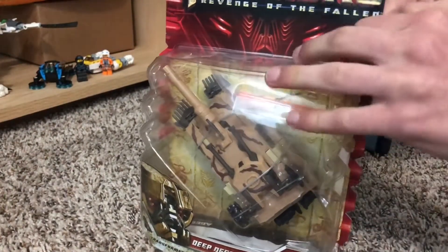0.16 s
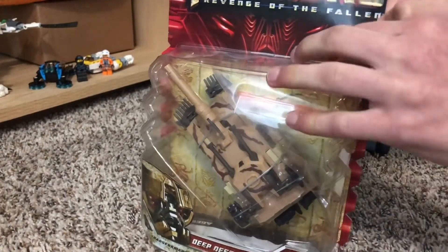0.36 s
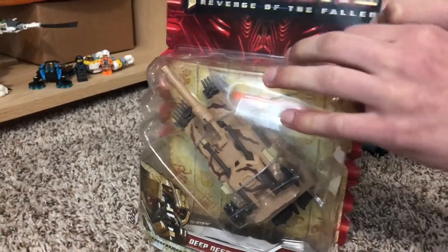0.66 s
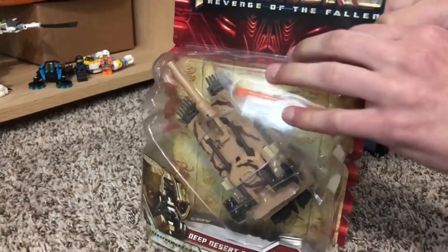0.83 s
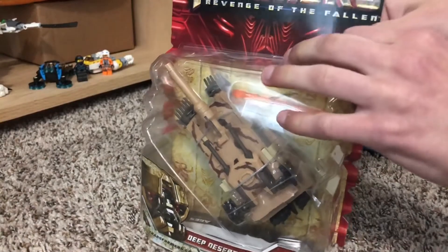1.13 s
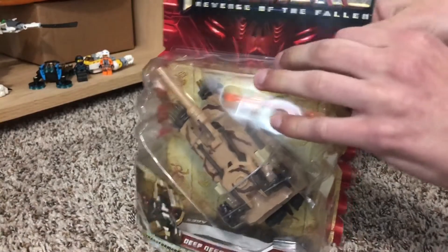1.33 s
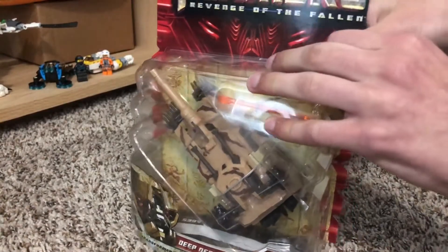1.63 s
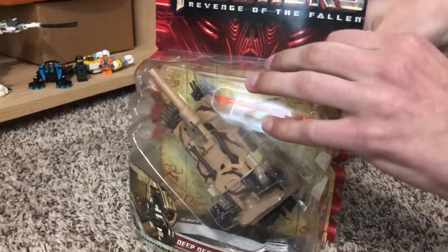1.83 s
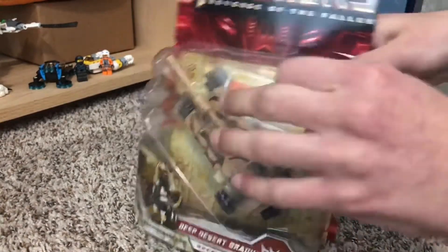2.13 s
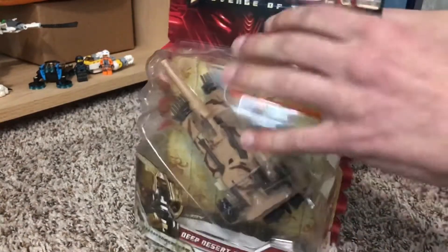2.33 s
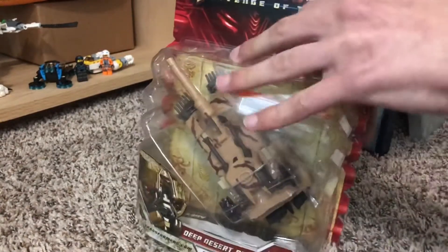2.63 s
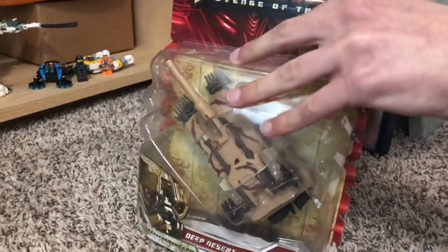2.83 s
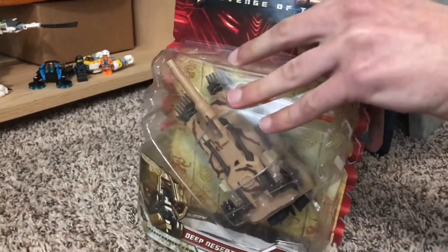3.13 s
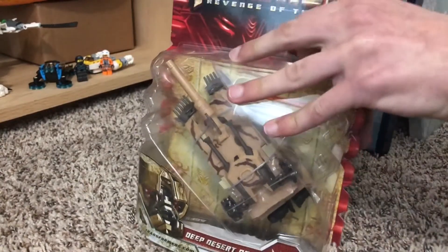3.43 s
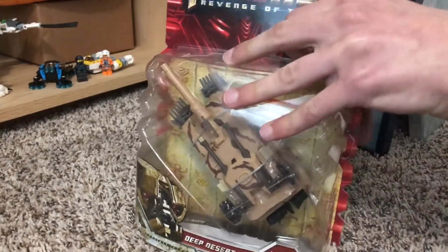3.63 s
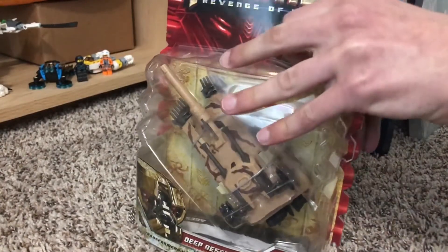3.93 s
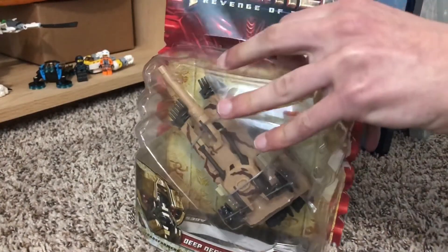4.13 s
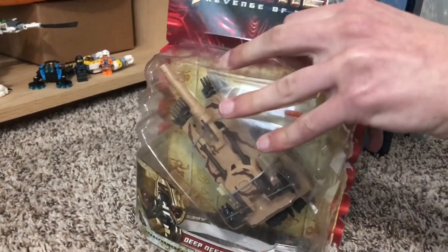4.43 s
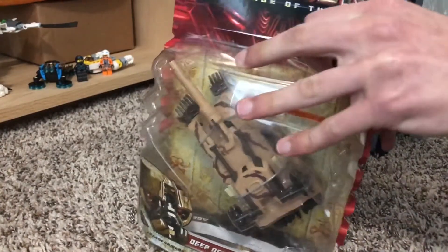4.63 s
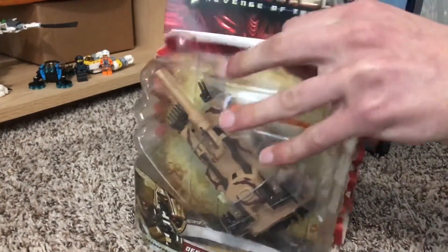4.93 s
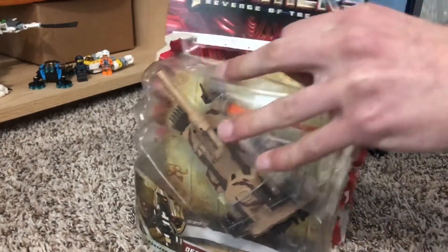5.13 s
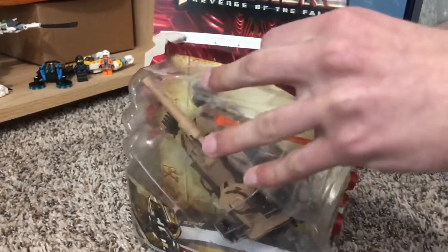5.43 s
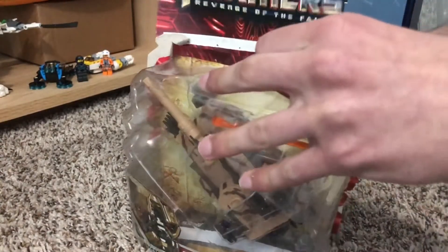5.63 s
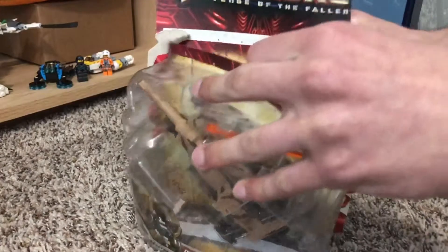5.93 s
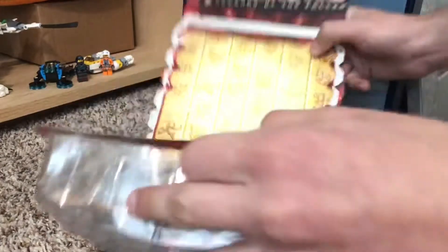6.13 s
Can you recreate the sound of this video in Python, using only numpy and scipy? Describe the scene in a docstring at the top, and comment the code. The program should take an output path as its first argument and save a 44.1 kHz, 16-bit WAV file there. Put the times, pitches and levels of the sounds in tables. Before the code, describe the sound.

A close, dry recording of stiff plastic packaging peeled from cardboard in a small carpeted room, over faint air, soft handling rumble and a low wavering hum that fades. The first half second is nearly quiet, with only slight seam crackle. From 0.65 to 1.5 s small snaps, ticks and short rips appear, with dull finger scuffs on card. Around 1.8 to 2.1 s hollow pops thicken over a steady rip and a soft bump. Louder single pops strike at 2.7 and 3.0 s, then sharp bright cracks at 3.5 s. A swelling tear with clustered snaps peaks at 4.0 to 4.1 s, followed by a lull. At 4.8 to 4.95 s a harder ripping burst comes with low bumps. Pops continue at 5.25, 5.35 and 5.5 s, then a dense, loud volley of cracks and tearing at 5.9 to 6.0 s, one last snap near 6.1 s, and quiet.

```python
"""Sharp snaps and hollow pops of a stiff plastic blister shell, peeled off its cardboard close by in a carpeted room.
Each snap is a run of cracks that rings the shell's modes; one panel resonates at its own pitch over a hollow boom.
Between them the glued seam rips in spurts of tiny random fibre breaks, with plastic crinkles and drumming card.
Single glue spots tick (noise bursts) and a few times the pack bumps the carpet (short, damped low tones).
Behind lie a low wavering hum, a soft rumble and air (shaped noise); diffuse reflections surround the pack."""
import sys
import numpy as np
from scipy import signal
from scipy.fft import rfft, irfft
from scipy.io import wavfile

SR = 44100
rng = np.random.default_rng(int(sys.argv[2]) if len(sys.argv) > 2 else 0)


def transcribe(signal):
    """Save signal, clipped to [-1, 1], as a 16-bit WAV file at the path in sys.argv[1]."""
    frames = np.atleast_2d(signal).T
    limited = np.clip(frames, -1, 1)
    pcm = np.round(limited * 32767).astype(np.int16)
    wavfile.write(sys.argv[1], SR, pcm)


N = 276830
CUTOFF_HZ = 16100  # top of the shell modes and of the finished sound
RING = 4096  # length of a short sound and of the filter spectra, in samples
FADE = np.linspace(5, -1, RING).clip(0, 1)  # full level at first, then a smooth close


def from_db(db):
    """Decibels to gain."""
    return 10 ** (np.asarray(db) / 20)


def rms_one(x):
    """Scale to unit power."""
    return x / np.sqrt(np.mean(x ** 2) + 1e-20)


def at_hz(points, hz):
    """Read a curve over pitch on a log-frequency axis."""
    point_hz, value = np.transpose(points)
    return np.interp(np.log(hz + 1), np.log(point_hz), value)


def causal(gain):
    """The minimum-phase response with these gains: nothing sounds early."""
    cepstrum = irfft(np.log(gain + 1e-6))
    cepstrum[1:RING // 2] *= 2
    cepstrum[RING // 2 + 1:] = 0
    return np.exp(rfft(cepstrum))


def coloured(x, spectrum):
    """Filter by a spectrum; white input keeps its power."""
    hz = np.fft.rfftfreq(RING, 1 / SR)
    gain = rms_one(from_db(at_hz(spectrum, hz)))
    return signal.fftconvolve(x, irfft(causal(gain)))[:N]


def drift(rate):
    """Random wandering with spread 1, taking a new direction `rate` times per second."""
    knots = rng.standard_normal(int(N / SR * rate) + 2)
    return rms_one(np.interp(np.arange(N) / SR * rate, np.arange(len(knots)), knots))


def add(out, s, sound):
    """Mix a sound in at a time."""
    at = max(int(s * SR), 0)
    out[at:at + len(sound)] += sound[:max(N - at, 0)]


# fader moves of the room hum: time_s, level_db
HUM_LEVEL = [(0, -49), (.6, -57.5), (2.4, -51.5), (2.7, -66), (4.3, -62), (6.28, -68)]
# tone of the rumble of hands on the pack: pitch_hz, density_db (per Hz, relative)
RUMBLE_TONE = [(40, -23.5), (85, 2), (125, -3.5), (190, -10.5), (240, -1.5), (320, -28.5), (700, -44.5)]
# tone of the still air: pitch_hz, density_db (per Hz, relative)
AIR_TONE = [(25, -11), (50, 5), (130, 5), (240, 3), (310, -1), (520, 2), (760, 2.5), (1050, 1.5),
            (1550, 1.5), (2400, -4), (4000, -10), (8000, -22.5), (16000, -49)]
RUMBLE_DB, AIR_DB = -52.5, -52


def background(hum_hz, wavers_per_s):
    """A low sine wavering in level and phase, the noise rumble of hands on the pack, and still air as noise."""
    t = np.arange(N) / SR
    hum_s, hum_db = np.transpose(HUM_LEVEL)
    phase = 2 * np.pi * hum_hz * t
    hum = rms_one((5.4 + drift(wavers_per_s)) * np.sin(phase) + drift(wavers_per_s) * np.cos(phase))
    rumble = coloured(rng.standard_normal(N), RUMBLE_TONE)
    air = coloured(rng.standard_normal(N), AIR_TONE)
    return from_db(np.interp(t, hum_s, hum_db)) * hum + from_db(RUMBLE_DB) * rumble + from_db(AIR_DB) * air


# how long the room rings, to 60 dB down: pitch_hz, t60_s
ROOM_T60 = [(150, 0.22), (500, 0.29), (1400, 0.38), (3700, 0.24), (10000, 0.2), (16000, 0.1)]


def room(x, wet_db, first_s):
    """Diffuse reflections start after a short gap and die band by band."""
    t, tail = np.arange(SR // 2) / SR, 0
    edges = np.geomspace(100, 17000, 11)
    for low, high in zip(edges, edges[1:]):
        t60 = at_hz(ROOM_T60, np.sqrt(low * high))
        band_pass = signal.butter(2, [low, high], "band", fs=SR, output="sos")
        band = signal.sosfilt(band_pass, rng.standard_normal(len(t)))
        tail = tail + band * np.exp(-np.log(1000) * t / t60)
    # silent until first_s, fully open at twice that
    opening = np.clip(t / first_s - 1, 0, 1)
    return from_db(wet_db) * signal.fftconvolve(x, tail * opening)[:N]


# a few times the pack bumps the carpet: start_s, drive_db (before attack and decay), pitch_hz
THUMPS = [(1.979, -21, 163), (4.846, -25, 206), (4.888, -22, 144), (4.902, -25, 140)]


def thumps(attack_s, decay_s):
    """The bumped pack swings for a few cycles, damped by hands and carpet."""
    out, t = np.zeros(N), np.arange(RING) / SR
    envelope = (1 - np.exp(-t / attack_s)) * np.exp(-t / decay_s) * FADE
    for s, drive_db, hz in THUMPS:
        add(out, s, from_db(drive_db) * np.sin(2 * np.pi * hz * t) * envelope)
    return out


# single spots of glue let go: start_s, strength_db (relative)
TICKS = [(0.9173, -23.5), (1.0503, -31), (1.3375, -30.5), (1.457, -26.5), (1.563, -27.5), (1.697, -26.5),
         (1.9405, -20), (2.18, -25.5), (2.204, -30), (2.4593, -30.5), (2.6374, -24.5), (2.7891, -20.5),
         (2.9253, -26), (3.0352, -14.5), (3.153, -39), (3.756, -21), (3.8765, -24), (4.066, -22),
         (4.198, -39), (4.362, -34.5), (4.3798, -31), (4.7363, -25.5), (5.06, -32.5), (5.1412, -27),
         (5.2143, -26), (5.2754, -24), (5.668, -33), (5.809, -32.5), (6.2311, -27.5)]
# bright tone of tearing paper, for the ticks and the seam: pitch_hz, density_db (per Hz, relative)
RIP_TONE = [(300, -6), (900, 7), (2000, 1.5), (3800, 2.5), (5500, 2.5), (8500, 2.5), (12000, -1.5),
            (16000, -4)]


def glue_ticks(decay_s, level_db):
    """Each spot of glue parts with a tiny bright burst that scatters briefly in the card."""
    out, t = np.zeros(N), np.arange(RING) / SR
    scatter = from_db(-14) * np.exp(-t / (4 * decay_s))
    burst = np.exp(-t / decay_s) + scatter
    for s, strength_db in TICKS:
        add(out, s, from_db(strength_db + level_db) * rng.standard_normal(RING) * burst)
    return coloured(out, RIP_TONE)


def breaks(per_s, spread_db):
    """Fibres break at random, with widely spread strengths; unit power."""
    born = rng.random(N) < per_s / SR
    strength = from_db(spread_db * np.minimum(rng.exponential(1, N), 4))
    return rms_one(born * strength * rng.choice([-1, 1], N))


def slips(per_s, decay_s, spread_db, creep):
    """The tear front jumps: each jump starts at once and dies fast, over a steady creep; unit power."""
    sizes = from_db(spread_db * np.clip(rng.standard_normal(N), -2, 2))
    jumps = (rng.random(N) < per_s / SR) * sizes
    return rms_one(creep + signal.lfilter([1], [1, -np.exp(-1 / (decay_s * SR))], jumps))


def edge_echo(x, share, delay_ms, shifts_per_s):
    """The nearby edge reflects each break, inverted; the delay, and so the colour, shifts as the tear jumps along."""
    n = np.arange(N)
    lag = delay_ms / 1e3 * SR * 2 ** (.5 * drift(shifts_per_s))
    echo = x[np.clip(n - lag.astype(int), 0, N - 1)]
    return (x - share * echo) / np.sqrt(1 + share ** 2)


def crinkles(per_s, spread_db, q, count=10):
    """Tiny creases in the blister's rim tick at random, each at a high pitch of its own; unit power."""
    total = np.zeros(N)
    for hz in np.geomspace(3500, 14000, count):
        ticks = breaks(per_s / count, spread_db) + 1e-18
        total += signal.lfilter(*signal.iirpeak(hz, q, fs=SR), ticks)
    return rms_one(total)


SWELL_CURVE = 1.3  # above 1, a swell starts and stops more abruptly than it crests


def swell(s, level_db, rise_s, fall_s):
    """Gain that grows to a climax and dies away, by 20 dB in each given time."""
    t = np.arange(N) / SR - s
    away = np.maximum(-t / rise_s, t / fall_s).clip(0, 5)
    return from_db(level_db - 20 * away ** SWELL_CURVE)


# the seam peels under a held pull: start_s, end_s, strength_db
PEELS = [(0.093, 0.565, -66.5), (0.92, 1.165, -65), (1.223, 1.3, -63), (1.464, 2.12, -52.5),
         (2.524, 3.053, -56), (3.63, 4.07, -54), (4.747, 4.995, -52), (5.094, 5.433, -58.5),
         (5.512, 5.74, -64.5), (5.83, 5.98, -71)]
PEEL_ATTACK_DB_PER_S, PEEL_RELEASE_DB_PER_S = 800, 345
# the pull is never quite steady
WAVER_DB, WAVERS_PER_S = 4, 19
# the tear runs away, then stalls: climax_s, strength_db, rise_s (by 20 dB), fall_s (by 20 dB)
SPURTS = [(0.925, -44, .042, .11), (1.07, -47, .045, .055), (1.775, -48, .08, .04), (2.53, -41, .06, .06),
          (2.69, -50.5, .08, .06), (2.785, -46.5, .04, .1), (2.93, -50.5, .05, .13),
          (3.395, -53, .025, .03), (3.92, -47.5, .07, .1), (4.03, -33.5, .11, .08), (4.305, -52, .05, .05),
          (4.755, -47.5, .035, .045), (4.88, -31.5, .11, .07), (5.28, -47, .09, .11), (5.4, -52, .06, .05),
          (5.59, -49, .09, .06), (5.94, -30, .07, .08)]


def ripping():
    """Strength of the tear: wavering held pulls and runaway spurts add in power."""
    t = np.arange(N) / SR
    waver_db = WAVER_DB * drift(WAVERS_PER_S)
    strengths = [swell(*row) for row in SPURTS]
    for start, end, db in PEELS:
        before_db = PEEL_ATTACK_DB_PER_S * np.maximum(start - t, 0)
        after_db = PEEL_RELEASE_DB_PER_S * np.maximum(t - end, 0)
        strengths.append(from_db(db + waver_db - before_db - after_db))
    return np.linalg.norm(strengths, axis=0)


# fingers shift their grip and scuff the card: climax_s, level_db
SCUFFS = [(1.08, -68), (1.24, -44), (1.45, -44.5), (1.775, -43), (2.03, -42.5), (2.785, -53), (3.045, -56),
          (3.4, -48), (3.88, -47.5), (4.79, -45.5), (5.0, -49), (5.57, -51)]
SCUFF_RISE_S, SCUFF_FALL_S = 0.089, 0.094
# dull tone of the drumming card: pitch_hz, density_db (per Hz, relative)
CARD_TONE = [(120, 1.5), (230, 6), (450, 7), (750, -5), (1200, -7), (2000, -23), (4000, -17.5),
             (9000, -49.5)]
# mix relative to the strength of the tear
FIBRES_DB, CRINKLES_DB, DRUMMING_DB = 1, -5, -5.5


def seam():
    """Ripping paper crackles brightly and plastic crinkles; tugs and scuffing fingers drum on the card."""
    rip = ripping()
    scuffing = sum(swell(s, db, SCUFF_RISE_S, SCUFF_FALL_S) for s, db in SCUFFS)
    jumps = slips(per_s=170, decay_s=.0018, spread_db=4, creep=.6)
    fibres = breaks(per_s=9000, spread_db=1.0) * jumps
    fibres = edge_echo(fibres, share=.45, delay_ms=.3, shifts_per_s=90)
    tugs = breaks(per_s=2500, spread_db=2.5) * slips(per_s=90, decay_s=.003, spread_db=3, creep=.7)
    paper = coloured(fibres * rip * from_db(FIBRES_DB), RIP_TONE)
    plastic = crinkles(per_s=230, spread_db=3.0, q=8.9) * rip * from_db(CRINKLES_DB)
    card = coloured(tugs * np.hypot(rip * from_db(DRUMMING_DB), scuffing), CARD_TONE)
    return paper + plastic + card


def shell_modes(t60_at_1k, slope, count=320):
    """A thin shell has evenly crowded modes, the high ones dying first: one ringing row each."""
    t = np.arange(RING) / SR
    hz = (np.arange(count) + 1 + rng.uniform(-.5, .5, count)) * CUTOFF_HZ / count
    t60 = t60_at_1k * (hz / 1e3) ** -slope
    return np.cos(2 * np.pi * hz[:, None] * t) * np.exp(-np.log(1000) * t / t60[:, None])


def evened(wave):
    """Level a spectrum over about half an octave; the finer peaks and gaps of the modes remain."""
    k, total = np.arange(len(wave)), np.cumsum(np.abs(wave) ** 2)
    low = np.maximum(k - k // 6 - 9, 0)
    high = np.minimum(k + k // 6 + 9, k[-1])
    return wave / np.sqrt((total[high] - total[low]) / (high - low) + 1e-9)


# the shell buckles: start_s, crack_db, boom_db (hollow), brightness_db_per_octave (of the crack),
# panel_hz (resonance of the panel that flips), break_ms (length of the run of cracks)
SNAPS = [(0.6532, -20, 1, -7.5, 477, 2.1), (0.8147, -23, -3, -6, 480, 3.3), (0.949, -5, 0, -4.5, 400, 2.1),
         (1.067, -9, -2.5, -2, 460, 0.67), (1.1554, -35, -2.5, 0.5, 484, 1.5),
         (1.2189, -12, -8, -3.5, 1160, 1.9), (1.238, -6.5, 4, -6.5, 1190, 1.7),
         (1.4679, -8.5, -0.5, -1.5, 390, 0.37), (1.772, -2.5, 8, -3.5, 554, 7.9),
         (1.7847, 2, 8, -31, 496, 4.4), (1.975, 11, 23, -7, 1700, 1.95), (2.0305, -0.5, 9, -11, 1760, 4.1),
         (2.0969, 0, 9, -8.5, 3430, 1.9), (2.3045, -12, -0.5, -7.5, 213, 2.8),
         (2.5238, -2.5, 9.5, -2, 490, 3.3), (2.539, -1.5, -4, -2.5, 1200, 2.4),
         (2.727, 16, 21, -18.5, 486, 5.1), (2.8133, 6.5, -12, -7, 1200, 1.35),
         (2.874, 2, 6, -24, 470, 2.05), (3.0389, 15.5, 21, -4.5, 950, 0.75),
         (3.3942, -5, 4, -8.5, 545, 3.8), (3.479, 10, 20, -1.7, 4200, 0.58),
         (3.4847, 10, 10.5, -7.5, 1330, 1.15), (3.623, 0, 17.5, -7, 318, 3.6),
         (3.6935, 3, 1.5, -9.5, 3400, 1.2), (3.8263, -4.5, 4, -27, 890, 3.2),
         (4.0158, 6.5, 12, -8.5, 1690, 2.35), (4.028, 11.5, 9, -8.5, 1830, 2.7),
         (4.0347, 5, 13.5, -6, 1500, 8.8), (4.12, 11, 17, -10, 525, 2.17), (4.428, -10.5, 5, -11, 363, 5.7),
         (4.7993, -3, -3, -4.5, 306, 2.4), (4.8401, 15.5, 13, -9.5, 1260, 6.6),
         (4.867, 0, 13.5, -0.5, 586, 10.6), (4.883, 2.5, 19.5, 0, 148, 3.3), (4.9277, 0.5, 2, -5, 500, 1.1),
         (4.9368, -5, 10.5, -22, 513, 1.32), (5.2398, 3.5, 15.5, -7, 596, 3.4),
         (5.2867, -9, 9, -12, 400, 2.1), (5.3422, 16.5, 23.5, -10, 620, 2.25),
         (5.5123, -4, -10, -13, 1320, 2.2), (5.5429, -1, 3.5, -7.5, 553, 3.4),
         (5.894, 13.5, 17.5, -7.5, 630, 2.7), (5.926, 14, 17, -12, 507, 1.7),
         (5.9307, 16, 23, -5, 330, 8.8), (5.9393, 11.5, 18, -7.5, 456, 3.9), (5.9483, 7, 20, -11, 710, 4.3),
         (5.96, 12, 20, -11.5, 740, 6), (5.9797, 5.5, 8, -10, 900, 12), (6.0867, 2, 0, -7, 1660, 2.9)]
# sharp voice of a snap: pitch_hz, level_db
CRACK_TONE = [(240, -10), (500, -3.5), (930, 1.5), (1600, 0)]
# hollow voice of a snap, the air inside: pitch_hz, level_db
BOOM_TONE = [(120, -8), (240, -3), (480, 0.5), (930, -15.5), (2000, -31.5), (8000, -73)]
# treble colour of the shell: pitch_hz, level_db
SHELL_TONE = [(1700, 0), (2600, -1.5), (3600, 4), (4900, 1.5), (6500, -1.5), (8800, 2.5), (13000, -1.5),
              (16000, -10.5)]
KNEE_HZ = 1480  # brightness tilts the crack above this pitch


def snaps(scatter, panel_db, grit_db, low_cut_hz, lag_ms):
    """A crease cracks and bending waves cross the shell, treble first.

    One panel resonates at its own pitch over a hollow boom of the air inside.
    """
    out, modes = np.zeros(N), shell_modes(t60_at_1k=.028, slope=.5)
    hz, ms = np.fft.rfftfreq(RING, 1 / SR), np.arange(RING) / SR * 1e3
    # a small shell radiates little bass
    bass_cut = hz ** 3 / (hz ** 3 + low_cut_hz ** 3)
    radiated = from_db(at_hz(SHELL_TONE, hz)) * bass_cut / (1 + (hz / CUTOFF_HZ) ** 40)
    # bending waves travel at a speed that grows with the root of frequency; lag_ms is their delay near 500 Hz
    travel = np.exp(-4j * np.pi * lag_ms / 1e3 * np.sqrt(650 * (hz + 150)))
    octaves = np.log2(np.maximum(hz / KNEE_HZ, 1))
    for s, crack_db, boom_db, brightness, panel_hz, break_ms in SNAPS:
        # every crease meets the modes with strengths of its own
        ring = (1 + scatter * rng.standard_normal(len(modes))) @ modes
        # the run of cracks swells and dies within about the length of the break
        progress = ms / break_ms
        run = np.sqrt(progress) * np.exp(-2 * progress ** 2)
        grit = from_db(grit_db * rng.standard_normal(RING))
        cracks = rng.standard_normal(RING) * grit * run
        wave = evened(rfft(ring) * rfft(cracks))
        # the flipping panel's resonance stands out by panel_db
        panel = 1 / (1 + (3 * (hz / panel_hz - panel_hz / (hz + 1))) ** 2)
        crack = from_db(crack_db + at_hz(CRACK_TONE, hz) + brightness * octaves)
        boom = from_db(boom_db + at_hz(BOOM_TONE, hz))
        colour = np.hypot(crack, boom) * from_db(panel_db * panel)
        snap = irfft(wave * causal(colour * radiated) * travel)
        # start a third of the lag early, since the waves need time to cross
        add(out, s - lag_ms / 3e3, FADE * snap)
    return out


def scene():
    """The microphone faces the flipping panel; the walls hear the shell from all sides, with a smoother spectrum."""
    facing = snaps(scatter=3.53, panel_db=7, grit_db=4, low_cut_hz=117, lag_ms=2.474)
    all_round = snaps(scatter=.3, panel_db=1, grit_db=4, low_cut_hz=150, lag_ms=2)
    paper = seam() + glue_ticks(decay_s=0.00051, level_db=-6.5)
    walls = room(all_round + paper, wet_db=-42.0, first_s=0.00043)
    bumps = thumps(attack_s=0.00069, decay_s=.01)
    return (facing + bumps + paper + walls + background(hum_hz=70, wavers_per_s=8))[None]


def record(dry):
    """The microphone drops the deep bass; the top is cut steeply."""
    thin = signal.sosfilt(signal.butter(6, 42, "high", fs=SR, output="sos"), dry)
    return signal.sosfilt(signal.ellip(10, .1, 80, CUTOFF_HZ, fs=SR, output="sos"), thin)


dry = scene()
out = record(dry)
transcribe(out)
```